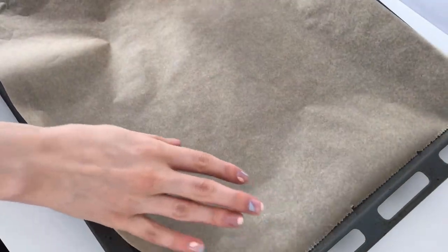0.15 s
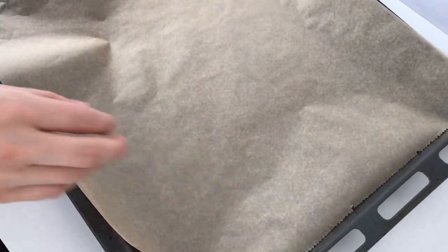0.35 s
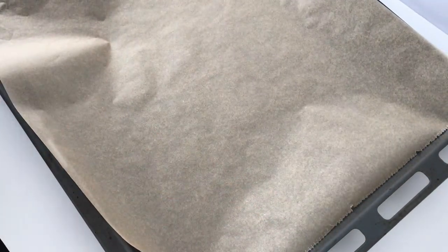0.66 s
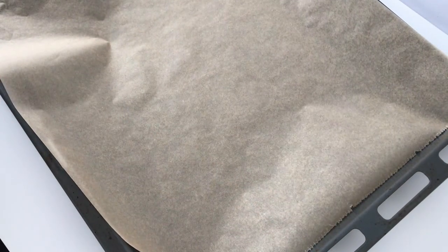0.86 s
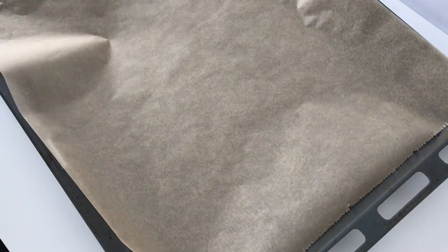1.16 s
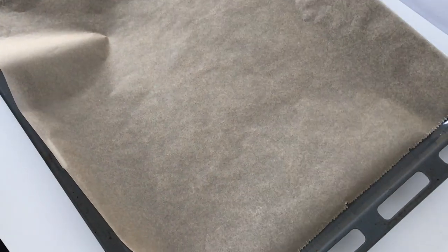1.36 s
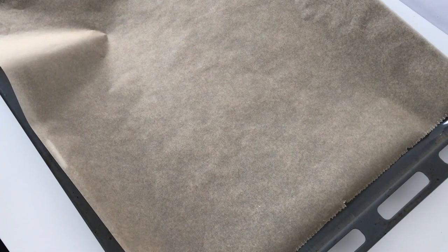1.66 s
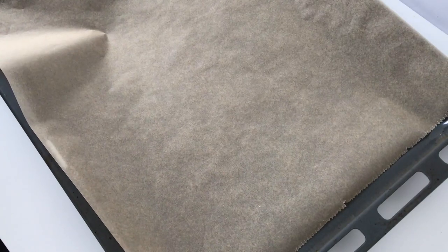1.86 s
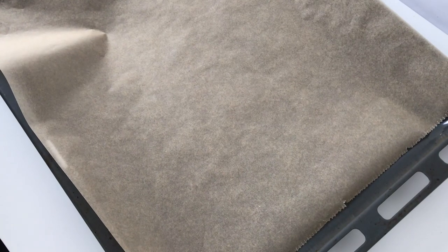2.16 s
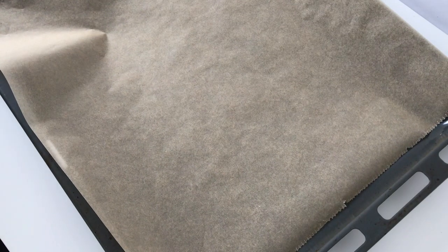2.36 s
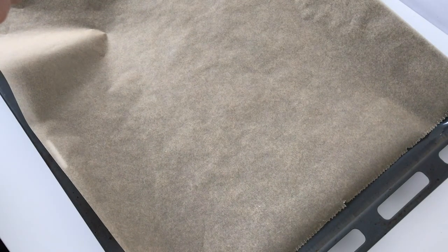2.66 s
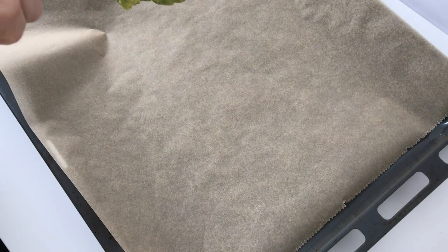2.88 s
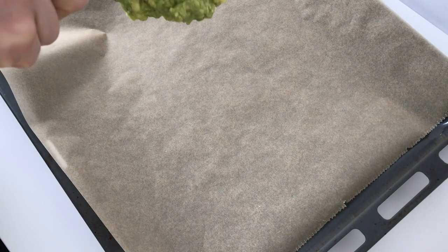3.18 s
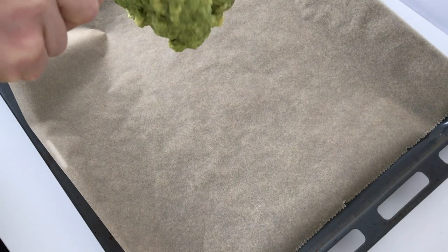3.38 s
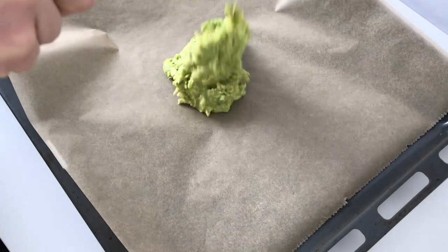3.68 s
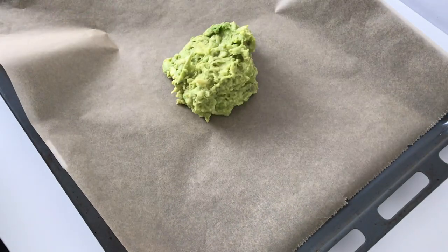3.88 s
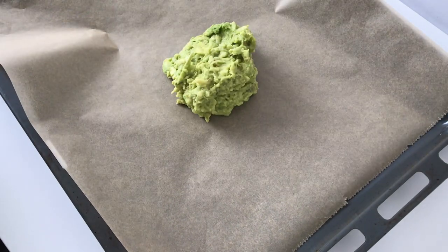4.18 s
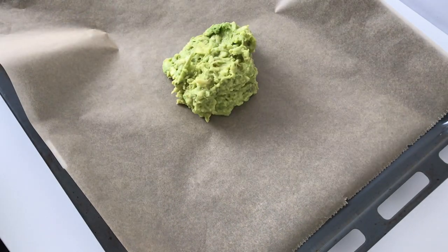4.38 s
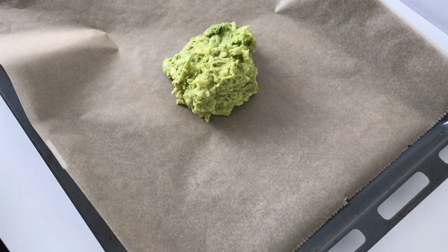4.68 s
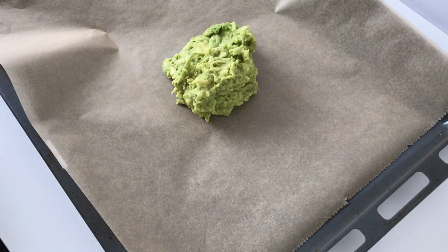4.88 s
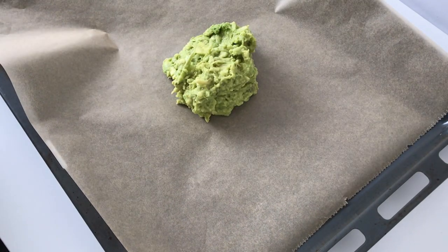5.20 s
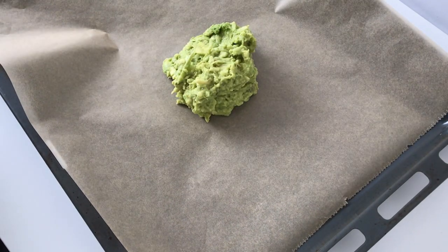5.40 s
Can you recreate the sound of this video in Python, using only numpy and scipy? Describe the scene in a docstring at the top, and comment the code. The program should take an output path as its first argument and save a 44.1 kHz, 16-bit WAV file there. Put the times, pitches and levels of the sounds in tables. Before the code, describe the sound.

Baking paper rustles crisply under a hand, sticky mash ticks softly, a wet lump slaps onto the papered tray, then a spoon knocks a bowl.

```python
"""Quiet kitchen: baking paper rustles on a metal tray, sticky mash smacks as a spoon scoops it, a lump
slaps onto the paper, the spoon knocks the bowl and scrapes along it for more.
Paper, mash and slap are gated noise and short noise bursts; tray and bowl are decaying modes;
the scrape is crackle through resonators. A sparse-tap room and steady noise surround them."""
import sys
import numpy as np
from scipy import signal
from scipy.fft import rfft, irfft
from scipy.io import wavfile
from scipy.ndimage import uniform_filter1d

SR = 44100
rng = np.random.default_rng(int(sys.argv[2]) if len(sys.argv) > 2 else 0)


def dump_mix(stems):
    """Bounce the given channels to the path in sys.argv[1] as a 16-bit WAV at rate SR."""
    frames = np.atleast_2d(stems).T  # one column per channel
    limited = np.clip(frames, -1, 1)  # hard clip at full scale
    pcm = np.round(limited * 32767).astype(np.int16)
    wavfile.write(sys.argv[1], SR, pcm)


N = 244314


def gain_of(db):
    """Decibels to amplitude gain."""
    return 10 ** (np.asarray(db) / 20)


def evened(x):
    """Scales to rms 1."""
    return x / np.sqrt(np.mean(x ** 2) + 1e-20)


def read(points, hz):
    """Interpolates a table on a log-frequency axis."""
    f, value = np.transpose(points)
    return np.interp(np.log(hz + 1), np.log(f + 1), value)


def add(mix, start_s, sound):
    """Mixes a sound in at start_s, cut at the end of the mix."""
    part = mix[round(start_s * SR):][:len(sound)]
    part += sound[:len(part)]


def colour(x, points):
    """Zero-phase filter from (frequency [Hz], gain [dB]) points."""
    f = np.fft.rfftfreq(len(x), 1 / SR)
    return irfft(rfft(x) * gain_of(read(points, f)), len(x))


def columns(rows):
    """Start time of a curve, and its other columns at sample rate."""
    s, *rest = np.transpose(rows)
    t = np.arange(s[0], s[-1], 1 / SR)
    return s[0], [np.interp(t, s, c) for c in rest]


def scattered(rows, count):
    """Random moments along a curve: time, level there, two uniform chance values."""
    s, level_db = np.transpose(rows)[:2]
    when, a, b = rng.random((count, 3)).T
    when = s[0] + .002 + when * (s[-1] - s[0])
    return zip(when, np.interp(when, s, level_db), a, b)


def crackle(count, per_s, spread_db, decay_s):
    """Noise gated by random decaying puffs, a few of them large; rms 1."""
    struck = rng.random(count) < per_s / SR
    size = gain_of(spread_db * np.minimum(rng.exponential(1, count), 4)) * struck
    puffs = signal.lfilter([1], [1, -np.exp(-1 / (decay_s * SR))], size)
    return evened(puffs * rng.standard_normal(count))


def burst(peak_db, hz, octaves, rise_s, decay_s, tail_db, tail_s):
    """A short noise puff around hz plus a ragged tail centred slightly lower."""
    t, f = np.arange(2048) / SR, np.fft.rfftfreq(2048, 1 / SR)
    head = (1 - np.exp(-(t + 1 / SR) / rise_s)) * np.exp(-t / decay_s) * rng.standard_normal(len(t))
    ragged = crackle(len(t), 1200, 3.0, .0006)
    tail = gain_of(tail_db) * np.exp(-t / tail_s) * ragged
    leak = gain_of(-23.5) * f / (f + 700)  # faint wideband part
    puff = 0
    for part, centre_hz in ((head, hz), (tail, 0.91 * hz)):
        bump = np.exp(-.5 * (np.log2((f + 1) / centre_hz) / octaves) ** 2)
        delayed = np.roll(part, 44)  # 1 ms of room for the filter's pre-ring
        puff = puff + irfft(rfft(delayed) * (bump + leak))
    return gain_of(peak_db) * puff / abs(puff).max()


def ring(modes, rise_s):
    """Sum of dying modes of random phase, level set by the first 10 ms."""
    t = np.arange(SR // 2) / SR
    out = 0
    for hz, db, t60 in modes:
        out = out + gain_of(db - 60 * t / t60) * np.sin(2 * np.pi * (hz * t + rng.random()))
    out = out * (1 - np.exp(-t / rise_s))
    return out / np.sqrt(2 * np.mean(out[:SR // 100] ** 2))


def floor():
    """Steady noise, strongest in the lows: low hum of the house over microphone hiss."""
    # (frequency [Hz], relative level [dB])
    floor_spectrum = [(13, -39), (22, -18.5), (48, -0.5), (188, -8.5), (248, -10), (335, -11), (507, -16),
                      (686, -16), (1850, -24), (2240, -24.5), (10200, -30), (15800, -28.5)]
    level_db = -69.5
    return gain_of(level_db) * evened(colour(rng.standard_normal(N), floor_spectrum))


def paper():
    """The hiss of sliding paper, grainy in its body and smooth on top, with single creases flipping."""
    # hand on paper, one curve a touch: (time [s], body level [dB], top over body [dB])
    touches = [
        [(0, -57.5, 7.5), (.19, -57, 3), (.235, -54.5, -7), (.25, -81.5, 3), (.7, -75.5, 1.5)],
        [(.7, -76, 3), (.9, -67, -1), (1.01, -54.5, -10), (1.04, -63.5, 1), (1.18, -59.5, 0),
         (1.3, -51.5, -4.5), (1.48, -63.5, 5), (1.56, -60, -7), (1.6, -75.5, 14)],
        [(1.6, -74, 10), (1.665, -68, 4), (1.685, -54, 4), (1.735, -58.5, -8), (1.795, -60, -19),
         (1.82, -82, 3), (2.0, -98, 0)],
    ]
    # rustle spectrum: (frequency [Hz], gain [dB])
    paper_spectrum = [(240, -60), (400, -7), (826, -3), (893, 4), (964, -0.5), (3120, 7), (7060, -7),
                      (10400, -11.5), (15000, -13), (16000, -5.5)]
    # larger creases flipping: (time [s], peak level [dB], centre [Hz])
    snaps = list([(0.0183, -31, 6140), (0.058, -47, 4380), (0.0764, -37.5, 3860), (0.1012, -34.5, 4330),
                  (0.1139, -43, 5000), (0.1291, -34, 3750), (0.1564, -38, 6670), (0.18, -36.5, 4900),
                  (0.1945, -30.5, 3360), (0.205, -37, 3000), (0.229, -37, 6510), (0.3944, -57, 4860),
                  (0.4578, -50.5, 3440), (0.632, -55, 5900), (0.7438, -53.5, 6100), (0.9108, -44.5, 1990),
                  (0.962, -40.5, 3200), (0.994, -41, 5650), (1.0018, -31, 3750), (1.012, -31.5, 6750),
                  (1.0676, -39, 3160), (1.194, -34.5, 4330), (1.2214, -44, 2920), (1.2662, -35.5, 3290),
                  (1.3055, -30, 2450), (1.3213, -47, 5060), (1.3872, -41, 4900), (1.4071, -36.5, 3230),
                  (1.4303, -44, 5000), (1.5147, -51.5, 1490), (1.549, -40.5, 3830), (1.68, -34.5, 4360),
                  (1.7022, -35.5, 6440), (1.716, -35, 3000), (1.7276, -41.5, 5870), (1.756, -43, 2950),
                  (1.7876, -52, 3220), (1.8285, -58, 8240), (3.8864, -39.5, 6500), (3.9433, -35.5, 4160)])
    # small creases: peak over rustle, downward spread, lowest centre, range above it
    crinkle_db, crinkle_spread_db, crinkle_hz, crinkle_range_octaves = 14, 5, 2200, 1.34
    # width at -39 dB; louder creases are narrower
    snap_octaves, octaves_per_db = 0.68, -0.01

    out = np.zeros(N)
    for rows in touches:
        start_s, (level_db, top_db) = columns(rows)
        grainy = colour(crackle(len(level_db), 900, 2.6, .0016), paper_spectrum)
        smooth = colour(crackle(len(level_db), 3000, 1.2, .003), paper_spectrum)
        body = evened(colour(grainy, [(6000, 0), (9000, -20)]))
        top = evened(colour(smooth, [(4500, -20), (7000, 0)]))
        add(out, start_s, gain_of(level_db) * (body + gain_of(top_db) * top))
        for s, db, a, b in scattered(rows, count=14):
            peak_db = db + crinkle_db - crinkle_spread_db * a
            snaps.append((s, peak_db, crinkle_hz * 2 ** (crinkle_range_octaves * b)))
    for s, db, hz in snaps:
        octaves = max(snap_octaves + octaves_per_db * (db + 39), .3)
        add(out, s - .002, burst(db, hz, octaves, 0.00062, 0.0021, -12.5, 0.0087))
    return out


def tray():
    """Low metal modes: the tray shakes under the hand, the lump and the knock."""
    # shakes: (time [s], level [dB], rise [s])
    shakes = [(1.304, -54.5, 0.0026), (1.394, -63.5, 0.002), (3.767, -39.5, 0.013), (4.622, -56.5, .0015)]
    # tray modes: (frequency [Hz], relative level [dB], t60 [s])
    tray_modes = [(121.9, 5, 0.095), (147.6, -10, 0.24), (258, 2, 0.13), (322, -10.5, 0.13),
                  (610, -10, 0.15), (892, -4.5, 0.08)]
    out = np.zeros(N)
    for s, db, rise_s in shakes:
        add(out, s, gain_of(db) * ring(tray_modes, rise_s))
    return out


def mash():
    """Air pockets pop as very short ticks, each with its own pitch, over a fizz of tiny ones."""
    # larger sticky pockets letting go: (time [s], peak level [dB], centre [Hz], width [octaves])
    smacks = list([(2.4904, -48.5, 1580, 0.8), (2.5292, -57, 8000, .95), (2.5756, -37.5, 3900, 0.31),
                   (2.5766, -43.5, 1130, 1), (2.6041, -45.5, 1220, 0.79), (2.6192, -44.5, 3730, .73),
                   (2.6711, -50, 11500, .2), (2.6908, -56, 14650, .33), (2.722, -55, 10970, .86),
                   (2.7456, -51, 14130, .5), (2.7599, -43.5, 2780, 0.55), (2.763, -50, 1180, .56),
                   (2.772, -44.5, 5900, 1.1), (2.8001, -46, 10370, 1.2), (2.8762, -38.5, 10600, 0.75),
                   (2.9261, -46, 10440, 0.62), (2.9474, -46, 12020, .28), (2.9641, -47, 6180, .5),
                   (2.972, -40, 7900, 1.24), (3.0004, -55, 985, .33), (3.0195, -51.5, 9510, .5),
                   (3.0657, -45, 6100, 0.2), (3.0816, -42, 4500, 2), (3.0923, -42, 10900, .44),
                   (3.1368, -43.5, 2800, 0.49), (3.1445, -42.5, 1140, 0.49), (3.1617, -45, 6100, .12),
                   (3.203, -46, 8900, 0.5), (3.2182, -47, 12870, .4), (3.2307, -39, 11700, .31),
                   (3.2402, -51.5, 2750, 0.5), (3.2535, -42.5, 6460, 0.66), (3.2674, -51, 7750, .57),
                   (3.3011, -42, 5930, 0.23), (3.3428, -50, 6280, 0.43), (3.3486, -52, 14880, .29),
                   (3.362, -41, 6000, 0.92), (3.3822, -39.5, 13210, 0.43), (3.3968, -46, 9270, .46),
                   (3.4227, -42, 6330, 0.23), (3.427, -39, 11000, 0.75), (3.437, -43, 9000, .61),
                   (3.4516, -43, 6140, 0.29), (3.4618, -53, 4440, .29), (3.5082, -48, 13940, .71),
                   (3.5254, -47.5, 8340, 0.63), (3.5449, -48, 13110, .47), (3.5513, -34.5, 11820, 0.49),
                   (3.5942, -37, 9100, .77), (3.6042, -39, 7500, .31), (3.6325, -37.5, 12900, 0.24),
                   (3.6448, -37.5, 6200, 0.35), (3.6624, -35, 8300, 1.1), (3.6944, -35.5, 7570, .73),
                   (3.7009, -35.5, 6100, 0.4), (3.723, -32.5, 5000, 0.5), (3.7274, -34.5, 11400, 0.23),
                   (3.7519, -30, 5640, 1.2), (4.149, -54.5, 10070, 0.79), (4.4418, -53, 12030, 0.63),
                   (4.6003, -55, 4960, .86), (4.8104, -43.5, 14260, .51), (4.879, -55, 3380, 0.44),
                   (4.9007, -38, 13900, 0.19), (5.0055, -40, 13070, 0.32), (5.024, -48, 10440, .86),
                   (5.052, -47, 3780, 0.43), (5.0805, -31.5, 9000, 0.32), (5.1126, -54, 14800, .5),
                   (5.1652, -38, 6500, 2.1), (5.185, -35, 6640, 0.18), (5.2014, -39.5, 12320, .58),
                   (5.209, -42, 2500, 2.3), (5.2183, -48, 11960, .29), (5.226, -46.5, 2740, 2.3),
                   (5.2379, -38, 13620, .79), (5.2433, -45, 6140, .19), (5.2595, -42, 14950, .66),
                   (5.2741, -41, 14880, 0.79), (5.2795, -42, 6120, 1.1), (5.2916, -37, 5280, 0.18),
                   (5.2977, -47, 6500, .6), (5.329, -55, 8500, .3), (5.3376, -46, 12840, .8),
                   (5.3604, -48, 5610, 0.27), (5.3728, -41, 4900, .32), (5.3974, -44, 13680, 0.35),
                   (5.4079, -44, 6560, 0.99), (5.426, -38, 2870, 0.85), (5.4406, -39, 5000, 0.3),
                   (5.4515, -38.5, 5000, 1.7), (5.4664, -43.5, 14000, .23), (5.5143, -53, 12850, .26),
                   (5.5351, -44, 4740, 0.58)])
    # fine wet fizz, one curve a scoop: (time [s], level [dB])
    scoops = [
        [(2.4, -107), (2.554, -82), (2.722, -81), (3.166, -79), (3.418, -71), (3.636, -69.5), (3.75, -55)],
        [(4.9, -78), (5.086, -75), (5.24, -75), (5.314, -66), (5.54, -83.5)],
    ]
    # small pockets: peak over fizz, downward spread, lowest centre, range above it, width
    pop_db, pop_spread_db, pop_hz, pop_range_octaves, pop_octaves = 22, 8.5, 6000, 1.3, .5

    out = np.zeros(N)
    for rows in scoops:
        start_s, (level_db,) = columns(rows)
        grains = crackle(len(level_db), 500, 2.4, 0.00078)
        fizz = evened(colour(grains, [(1500, -8.5), (5000, -7.0), (13000, -1.5)]))
        add(out, start_s, gain_of(level_db) * fizz)
        for s, db, a, b in scattered(rows, count=14):
            peak_db = db + pop_db - pop_spread_db * a
            smacks.append((s, peak_db, pop_hz * 2 ** (pop_range_octaves * b), pop_octaves))
    for s, db, hz, octaves in smacks:
        decay_s, tail_s = 1.8 / hz + .00012, 0.0012 + 22 / hz  # higher pops die faster
        add(out, s - .001, burst(db, hz, octaves, .00003, decay_s, -13.0, tail_s))
    return out


def slap():
    """The lump lands: a dense crackle of crushed paper, dulling as it settles."""
    # crush spectrum: (frequency [Hz], gain [dB])
    slap_spectrum = [(180, -38), (300, -12), (537, -20.5), (2170, -6.5), (2360, -7), (2980, -3),
                     (3700, -1.5), (4020, -2), (4910, -3), (14700, -14.5), (16000, -22.5)]
    land_s, rise_s, hold_s = 3.768, .0016, .013
    crush_db, crush_fall_s = -24, 0.011
    settle_db, settle_fall_s = -37, .036
    treble_start_db, treble_end_db, treble_fall_s = 4.75, -5.7, 0.023

    out = np.zeros(N)
    t = np.arange(-.012, .3, 1 / SR)
    after = np.maximum(t - hold_s, 0)
    fall = gain_of(crush_db) * np.exp(-after / crush_fall_s)
    fall = fall + gain_of(settle_db) * np.exp(-after / settle_fall_s)
    level = np.exp(np.minimum(t, 0) / rise_s) * fall
    dulling = np.exp(-np.maximum(t, 0) / treble_fall_s)
    treble_db = treble_end_db + (treble_start_db - treble_end_db) * dulling
    crush = colour(crackle(len(t), 7000, 2.2, 0.00089), slap_spectrum)
    crush = crush / np.sqrt(uniform_filter1d(crush ** 2, size=500))  # dense: no long gaps
    low = colour(crush, [(6000, 0), (8500, -60)])
    treble = crush - low
    add(out, land_s + t[0], level * (low + gain_of(treble_db) * treble) / low.std())
    return out


def knock():
    """One hard knock of spoon on bowl: a noise crack, and modes struck once then by brief noisy chatter."""
    # bowl modes: (frequency [Hz], relative level [dB], t60 [s])
    bowl_modes = [(130, -25.5, 0.064), (630, -6.5, 0.048), (1144, -1.5, 0.028), (1810, -8, 0.027),
                  (2193, -3, 0.037), (2820, -7.5, 0.0348), (3490, 3, 0.0397), (3830, -9.5, 0.037),
                  (4260, -7.5, 0.026), (4625, 2.5, 0.032), (6060, -6, 0.046), (6150, 11.5, 0.021),
                  (7350, -9.5, .035), (7870, -3.5, 0.031), (8410, 0.5, .03), (11200, 0, 0.033),
                  (11850, -14, .03), (13800, -9, .03)]
    # crack spectrum: (frequency [Hz], gain [dB])
    crack_spectrum = [(60, -35), (450, -14.5), (640, -12.5), (860, -31.5), (1100, -11.5), (2300, -2),
                      (4600, 0.5), (5700, -7.5), (6300, -3), (8500, -3), (10000, -15), (11500, -3),
                      (16000, -14.5)]
    knock_s, crack_db, modes_db, chatter_db = 4.6217, -19.5, -22.5, -25.5

    out = np.zeros(N)
    t = np.arange(4096) / SR
    crack = evened(colour(rng.standard_normal(len(t)), crack_spectrum))
    decay = np.exp(-t / 0.0028)
    decay = decay + gain_of(-9.5) * np.exp(-t / 0.009) + gain_of(-25.0) * np.exp(-t / 0.033)
    add(out, knock_s, gain_of(crack_db) * crack * decay)
    chatter = gain_of(chatter_db) * rng.standard_normal(len(t)) * np.exp(-t / 0.0016)
    chatter[0] = 1  # the strike
    add(out, knock_s, gain_of(modes_db) * signal.fftconvolve(ring(bowl_modes, .0003), chatter))
    return out


def scrape():
    """Small slips of the spoon sound the rub bands of the bowl wall; pitch glides through each stroke."""
    # strokes: (start [s], length [s], level [dB], high-band share [0-1],
    # pitch glide [share above nominal at the start, below it at the end])
    strokes = [(4.909, .17, -74, 0.59, .04), (5.079, 0.21, -78, .17, .01), (5.273, .1, -63.5, 0.18, -0.051),
               (5.426, .045, -66.5, .1, 0.0085)]
    # rub bands: (centre [Hz], width [Hz], level [dB])
    rub_bands = [(1900, 290, 0), (3260, 210, -4), (4110, 170, 3.5), (7300, 400, -26.5)]
    rasp_db, stroke_shape = -14, 0.62  # wide rasp under the bands; exponent of the swell

    out = np.zeros(N)
    for start_s, length_s, level_db, high_share, glide in strokes:
        u = np.linspace(0, 1, round(length_s * SR))
        slips = crackle(len(u), 900, 2.3, 0.001)
        rasp = colour(slips, [(600, -25.5), (1500, -3.5), (7000, -4), (12000, -20)])
        rub = gain_of(rasp_db) * evened(rasp)
        for hz, width_hz, db in rub_bands:
            band = evened(signal.lfilter(*signal.iirpeak(hz, hz / width_hz, SR), slips))
            share = high_share if 4000 < hz < 5000 else 1 - high_share
            rub = rub + gain_of(db) * band * share
        gliding = np.interp(u + glide * u * (1 - u), u, rub)
        swell = np.sin(np.pi * u).clip(0) ** stroke_shape
        add(out, start_s, gain_of(level_db) * swell * gliding)
    return out


def kitchen(x):
    """Room tail: sparse taps of random sign, each band dying at its own speed."""
    # (frequency [Hz], t60 [s])
    room_t60 = [(100, .3), (700, 0.32), (2500, 0.29), (6000, 0.23), (12000, .18)]
    taps = np.zeros(SR // 2)
    at = np.arange(160, len(taps) - 10, 10)
    taps[at + rng.integers(0, 10, len(at))] = rng.choice([-1., 1.], len(at))
    hz, t, z = signal.stft(taps, SR, nperseg=128)
    decay = gain_of(-60 * t / read(room_t60, hz)[:, None])
    tail = signal.istft(z * decay, SR, nperseg=128)[1]
    return signal.fftconvolve(x, tail / np.linalg.norm(tail))[:N]


def scene():
    """Dry sources, each with its own share of room, over the floor."""
    rustle, lump = paper(), tray() + slap()
    wet, hit = mash() + scrape(), knock()
    sends = gain_of(-12.5) * (rustle + wet) + gain_of(-8) * lump + gain_of(-13.5) * hit
    return (rustle + wet + lump + hit + kitchen(sends) + floor())[None]


def record(dry):
    """Microphone colour, then a steep low-pass band limit."""
    # treble dip: (frequency [Hz], gain [dB])
    mic_response = [(8500, 0), (10500, -2.5), (12000, 0.5)]
    edge_hz = 15950
    heard = colour(dry[0], mic_response)[None]
    lowpass = signal.firwin(511, edge_hz, window=("kaiser", 9), fs=SR)
    return signal.oaconvolve(heard, lowpass[None], "same")


dry = scene()
out = record(dry)
dump_mix(out)
```